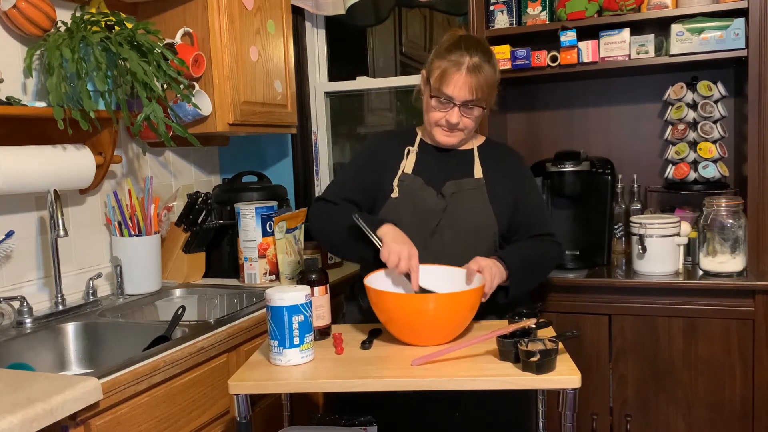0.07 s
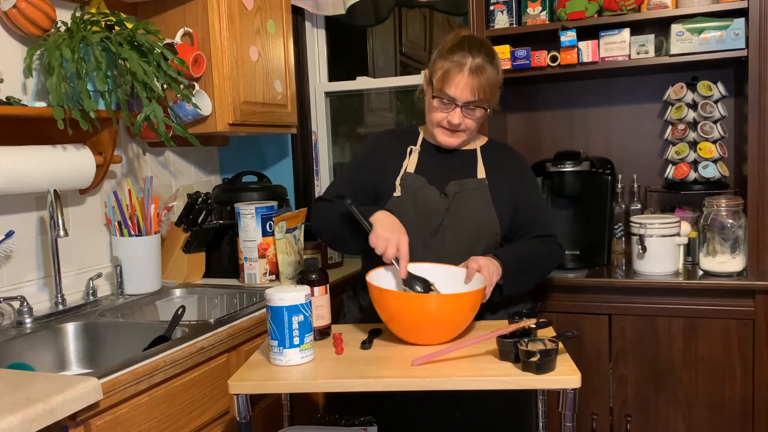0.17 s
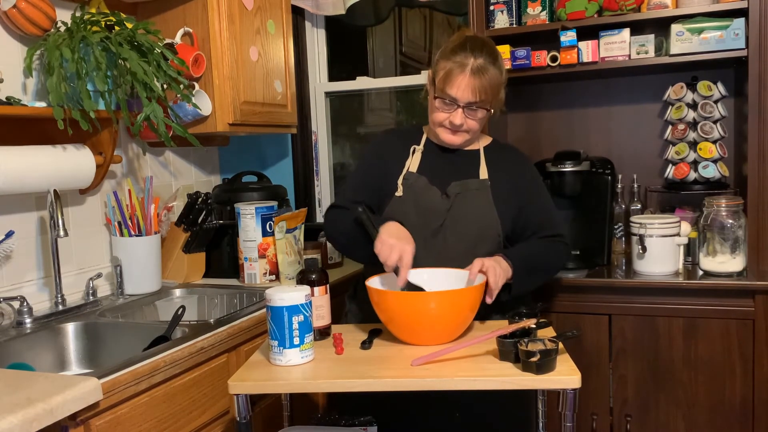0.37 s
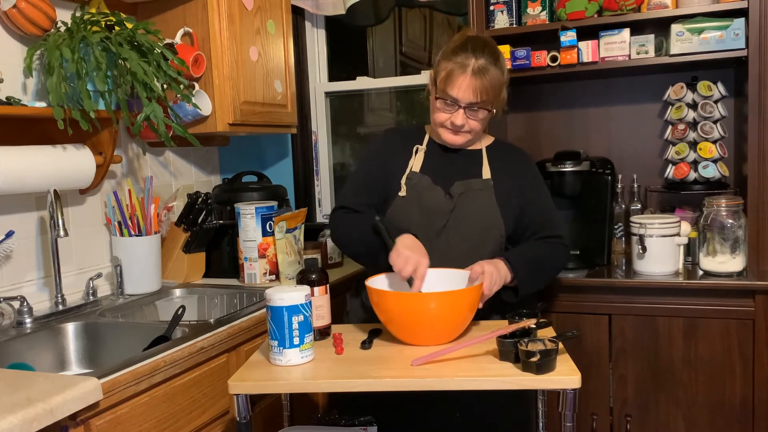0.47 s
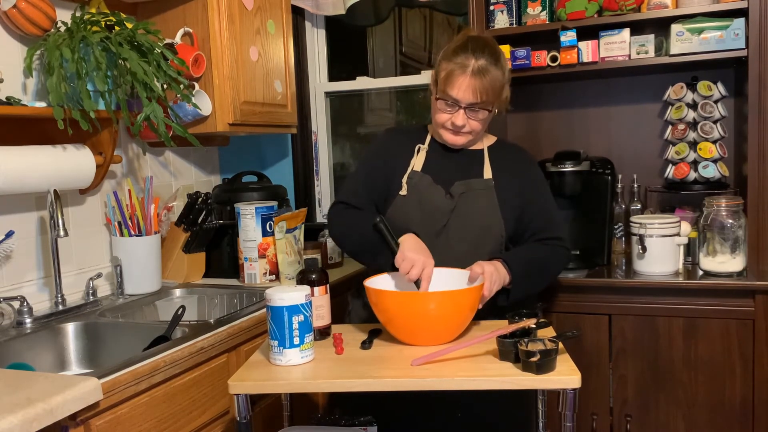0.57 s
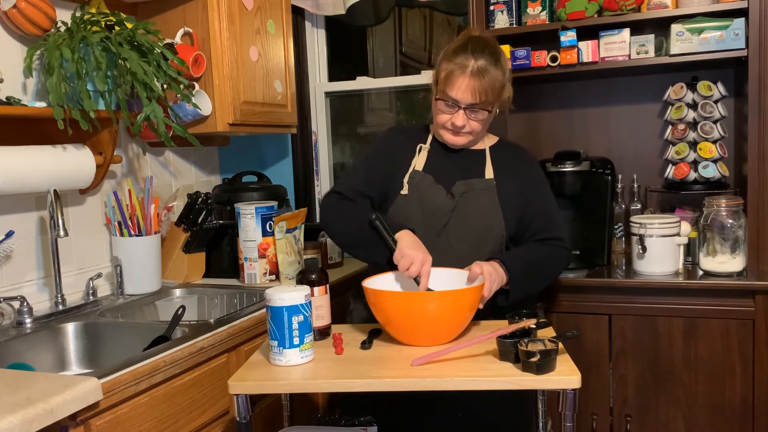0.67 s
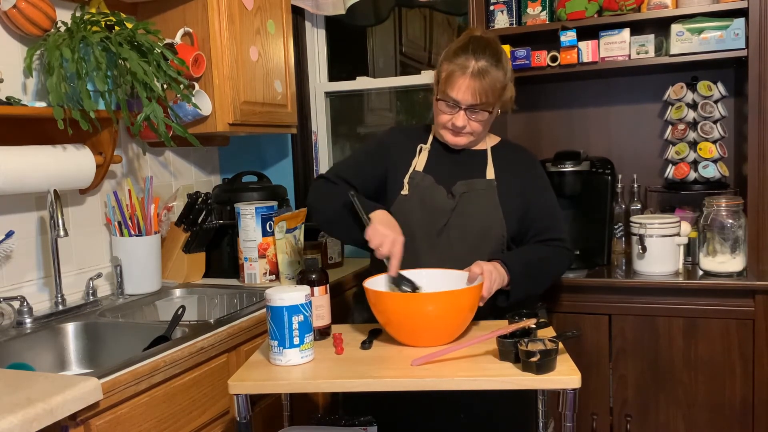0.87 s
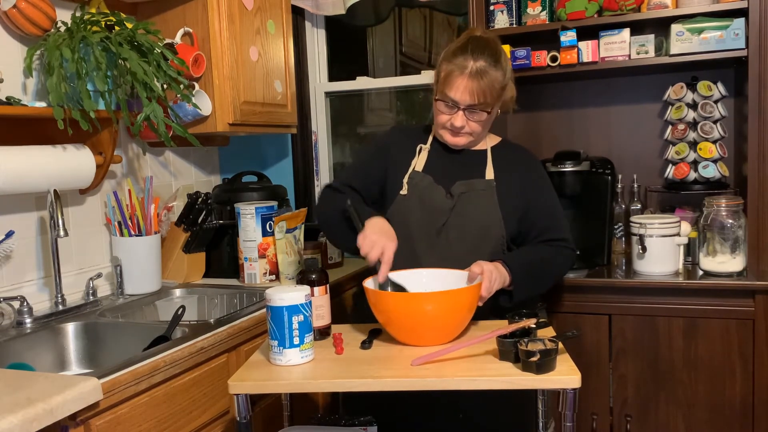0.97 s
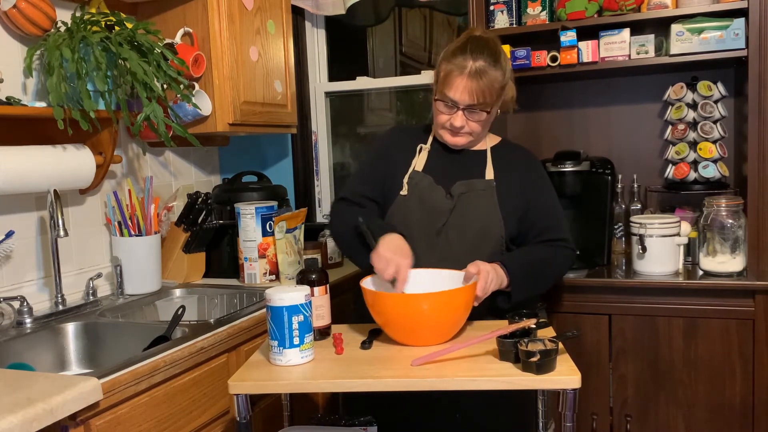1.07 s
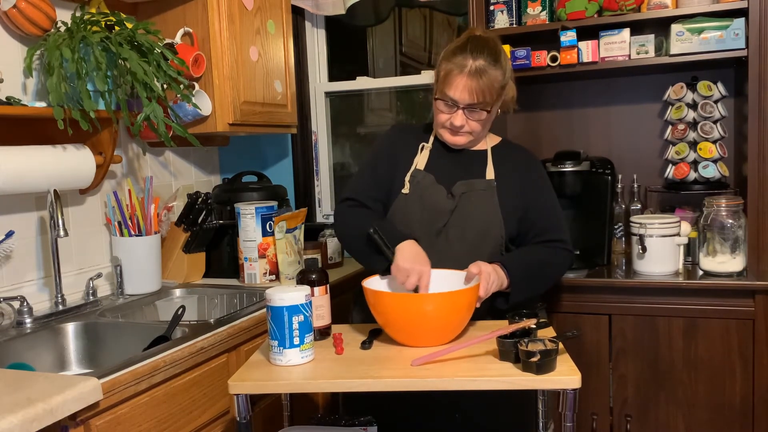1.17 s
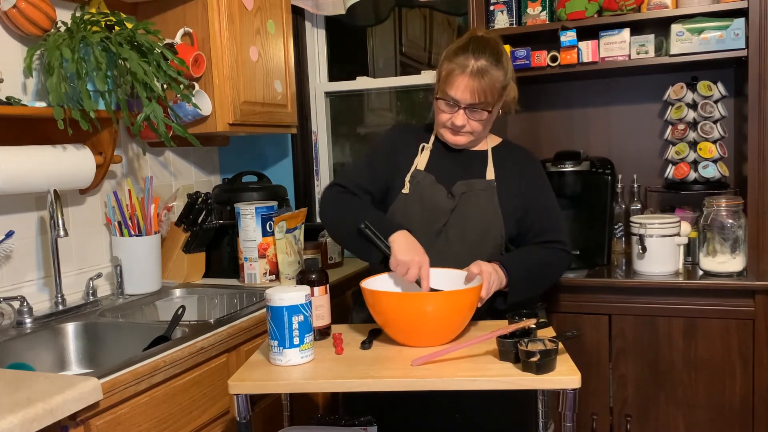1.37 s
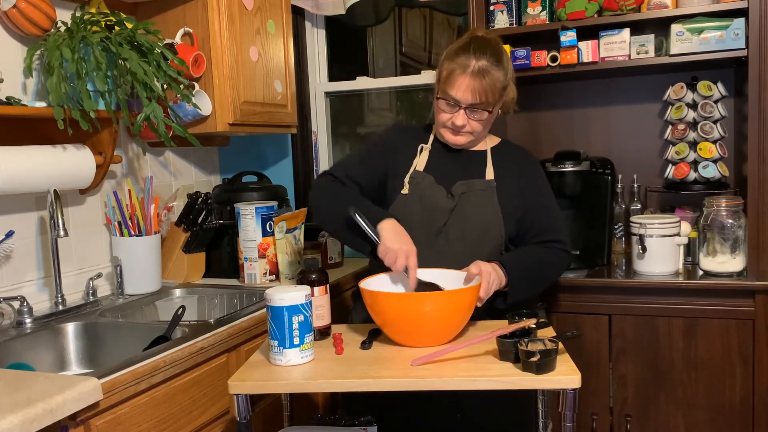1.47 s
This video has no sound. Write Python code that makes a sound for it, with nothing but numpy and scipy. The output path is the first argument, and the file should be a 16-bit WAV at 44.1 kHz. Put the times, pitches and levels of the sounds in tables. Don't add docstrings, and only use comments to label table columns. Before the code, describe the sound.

Stirring thick dough: a quiet scrape, one sharp hollow thud rattling bowl and board, light sticky strokes, then a longer firm drag and a short faint one, in a small room with low hum.

```python
import sys
import numpy as np
from scipy import signal
from scipy.fft import rfft, irfft, next_fast_len
from scipy.io import wavfile
from scipy.ndimage import uniform_filter1d

SR = 44100
rng = np.random.default_rng(int(sys.argv[2]) if len(sys.argv) > 2 else 0)


def wav_out(sig):
    wavfile.write(sys.argv[1], SR, np.round(np.clip(np.atleast_2d(sig).T, -1, 1) * 32767).astype(np.int16))


def voltage_ratio(decibels):
    exponent = np.asarray(decibels, float) / 20
    return 10 ** exponent


N = 66150
T = np.arange(N) / SR


def rms_one(x):
    return x / np.sqrt(np.mean(x ** 2) + 1e-20)


def at_hz(points, hz):
    p = np.array(points, float)
    return np.interp(np.log(np.maximum(hz, 1)), np.log(np.maximum(p[:, 0], 1)), p[:, 1])


def colour(x, gain):
    size = next_fast_len(N + 8192)
    hz = np.arange(size // 2 + 1) * SR / size
    return irfft(rfft(x, size) * gain(hz), size)[..., :N]


def drift(rate):
    r = np.exp(-2 * np.pi * rate / SR)
    noise = rng.standard_normal(N + SR)
    return rms_one(signal.lfilter([1], [1, -2 * r, r * r], noise)[SR:])


def ring(x, hz, t60):
    r = voltage_ratio(-60 / (t60 * SR))
    w = 2 * np.pi * hz / SR
    return signal.lfilter([0, np.sin(w)], [1, -2 * r * np.cos(w), r * r], x + 1e-18)


def resonances(x, table):
    out = 0
    for k, (hz, width, db) in enumerate(table):
        t60 = np.log(1000) / np.pi / width
        out = out + (-1) ** k * voltage_ratio(db) * np.sqrt(width) * ring(x, hz, t60)
    return rms_one(out)


def clicks(s, heights):
    out = np.zeros(N)
    np.add.at(out, (np.asarray(s) * SR).astype(int), heights)
    return out


def bursts(table):
    out = 0
    for s, db, hz, t60 in table:
        swell = ring(ring(clicks([s], voltage_ratio(db)), hz, t60), hz, t60)
        out = out + swell * 2 * np.e * np.log(1000) / (t60 * SR)
    return out


# time in seconds, drag in dB, extra weight on the wall in dB,
# dryness of the scrape in dB.
STROKES = [
    [(0.0, -65.5, 21, -12), (0.018, -66, 7.5, -9), (0.048, -66.5, 15.5, -9.5), (0.092, -66, 7.5, -10.5),
     (0.135, -77, 15, -9.5), (0.17, -101, 5, -17), (0.2, -108, 15, 19)],
    [(0.4, -77, 0, -19), (0.45, -65.5, 6, -14), (0.49, -68, 13, -9.5), (0.53, -72, 13, -13),
     (0.566, -77, -14.5, -9), (0.576, -83.5, 18, -7), (0.664, -77.5, 9, -17), (0.67, -83.5, 3, 0.5)],
    [(0.69, -71, 3, -14), (0.715, -75, -3, -13), (0.745, -83, 2.5, -6), (0.775, -75.5, 8, -12),
     (0.806, -71, -7.5, -14.5), (0.84, -73.5, 1.5, -15), (0.862, -67, 8, -24.5), (0.89, -78.5, 6, -27),
     (0.935, -82, -19, -9)],
    [(1.27, -71, 9, -7.5), (1.325, -80, 11, 1), (1.345, -74.5, 1.5, -0.5), (1.38, -77, -24, -4),
     (1.43, -77.5, 10, -7), (1.446, -76, 7, -10), (1.5, -78.5, -11, -7)],
]
FIRM_STROKE = [(.944, -70, 2, -7), (.951, -60, -4, -4.5), (.97, -66, 13, -2.5), (.99, -66, 10.5, -1.5),
               (1.003, -59, 7.5, -5.5), (1.03, -59.5, 8, -3.5), (1.055, -57.5, 9, -5.5),
               (1.075, -56, -1, -8), (1.095, -52.5, -3, -7), (1.13, -55, 3.5, 0), (1.155, -53, 0.5, -7),
               (1.18, -61, 7.5, -5), (1.215, -65, 0, -6)]
# pitch in Hz, width in Hz, level in dB.
WALL = [(620, 55, 4), (700, 92, 1), (850, 130, -3), (1040, 200, -3), (1410, 99, -13)]
# pitch in Hz, width in Hz, level in dB.
HOLLOW = [(1592, 170, -4.5), (1740, 120, 1), (2086, 220, -1), (2320, 200, 1), (2893, 2900, -4.5)]
# pitch in Hz, width in Hz, level in dB.
BOARD = [(135, 140, 1), (212, 54, -2.5), (310, 49, -8.5), (479, 22, -5.5)]
# frequency in Hz, level in dB per Hz.
RASP = [(1650, -36.5), (2800, 2.5), (6720, 0), (8730, -13.5), (9600, -12.5), (13300, -22), (16000, -14)]


def stir():
    s, *columns = np.concatenate(STROKES[:3] + [FIRM_STROKE] + STROKES[3:]).T
    drag, weight, dry = (np.interp(T, s, c) for c in columns)
    lift_s, return_s = STROKES[0][-1][0], STROKES[1][0][0]
    touching = (T < lift_s) | (T > return_s)

    slips_per_s, spread_db = 2500, 2
    sizes = voltage_ratio(spread_db * np.minimum(rng.exponential(1, N), 4)) * rng.choice([-1, 1], N)
    slips = sizes * (rng.random(N) < slips_per_s / SR * voltage_ratio(3.0 * drift(40)))

    rasp = rms_one(colour(slips, lambda hz: voltage_ratio(at_hz(RASP, hz)) * (hz > 2500)))
    top = colour(rasp, lambda hz: hz > 7930)
    grit = voltage_ratio(4.5 + 0.14 * (drag + 58) + 0.53 * dry) * top
    out = voltage_ratio(-6 + weight) * resonances(slips, WALL)
    out = out + voltage_ratio(-0.5) * resonances(slips, HOLLOW)
    out = out + voltage_ratio(1.5 + dry) * (rasp - top) + grit

    board = voltage_ratio(-56.5 + 0.94 * (drag + 55)) * resonances(np.roll(slips, SR // 3), BOARD)
    return (voltage_ratio(drag) * out + board) * uniform_filter1d(touching * 1.0, size=900)


# frequency in Hz, level in dB per Hz.
AIR = [(80, -4), (130, -9), (190, -8), (290, -7.5), (480, -12), (624, -10.5), (1330, -26), (2760, -30),
       (16000, -37.5)]
# time in seconds, level in dB.
HUM = [(0.0, -52.5), (0.182, -68), (0.38, -65), (0.462, -47), (0.492, -66), (0.53, -56), (0.718, -63),
       (0.78, -56.5), (0.844, -67), (0.925, -52), (0.948, -78), (0.98, -49), (1.136, -41), (1.168, -76),
       (1.202, -56), (1.35, -56), (1.474, -64.5), (1.5, -77.5)]


def background():
    air = colour(rng.standard_normal((2, N)), lambda hz: voltage_ratio(at_hz(AIR, hz)) * (hz > 70))
    hum_hz, rumble_width_hz = 58.2, 18
    tone = np.sin(2 * np.pi * hum_hz * T + 0.73 * drift(1)) * np.sqrt(2)
    hum = voltage_ratio(-0.97 + 2.7 * drift(7.4)) * tone
    noises = rng.standard_normal((2, N))
    rumble = np.array([resonances(w, [(hum_hz, rumble_width_hz, 0)]) for w in noises])
    load_db = np.minimum(np.interp(T, *np.transpose(HUM)), -54)
    fridge = voltage_ratio(load_db) * (hum + voltage_ratio(-11) * rumble)
    return voltage_ratio(-71.5 + 1.5 * drift(3.2)) * rms_one(air) + fridge


# start in seconds, peak in dB,
# pitch in Hz, time to fall 60 dB in seconds.
NUDGES = [(.002, -57, 160, 0.038), (.395, -46.5, 59.5, 0.1), (.47, -54, 88, 0.08), (.47, -53.5, 620, 0.056),
          (.625, -62.5, 630, .04), (.848, -61, 608, 0.056), (.859, -60, 642, 0.021),
          (.868, -64.5, 700, 0.028), (.90, -62, 161, 0.058), (1.012, -49, 497, 0.046),
          (1.015, -49, 630, 0.073), (1.06, -48, 512, 0.048), (1.095, -52.5, 490, 0.042),
          (1.10, -54, 1030, .03), (1.085, -45, 1880, .03), (1.105, -52, 1880, .025),
          (1.145, -56.5, 150.1, 0.13), (1.33, -64, 175, 0.035), (1.45, -70.5, 310, 0.059)]


def nudges():
    return bursts(NUDGES)


# time in seconds, level in dB.
KNOCKS = [
    (0.2324, -35),
    (0.2346, -23.5),
    (0.2374, -32.5),
    (.2445, -33),
    (0.2549, -35),
    (0.2647, -38),
    (0.2771, -34.5),
]
# pitch in Hz, level in dB, time to fall 60 dB in seconds.
MODES = [(51.4, -9.5, 0.44), (77.1, -9.5, 0.36), (127.4, -3.5, 0.31), (212.5, -5.5, 0.16),
         (296.2, -5.5, .17), (403, -7.5, 0.09), (466, -10.5, 0.26), (679, -7.5, 0.07), (815.5, -6, 0.2),
         (1030, -6.5, 0.071), (1314, -9.5, 0.2), (1716, -8, 0.099), (2120, -6.5, 0.1), (2394, -8.5, 0.15),
         (2977, -14, 0.13)]
# start in seconds, peak in dB, pitch in Hz,
# time to fall 60 dB in seconds.
THUDS = [
    (.2322, -30, 1090, 0.011),
    (.2334, -29, 1950, .012),
    (.2345, -18, 431, .018),
    (.2350, -19, 675, 0.018),
    (.2378, -31, 2360, .008),
    (.2395, -25, 647, 0.015),
    (.2530, -26, 462, .014),
    (.2690, -31, 620, .02),
    (.2760, -26, 220, .025),
]


def knock():
    swell_cycles, luck_db = 0.42, 2
    s, db = np.transpose(KNOCKS)
    luck = rng.normal(0, luck_db, (len(s), len(MODES)))
    out = 0
    for k, (hz, level_db, t60) in enumerate(MODES):
        ringing = ring(clicks(s, voltage_ratio(db + level_db + luck[:, k])), hz, t60)
        r = np.exp(-hz / swell_cycles / SR)
        out = out + ring(ringing, hz, np.log(1000) * swell_cycles / hz) * 2 * (1 - r)
    return out + bursts(THUDS)


# frequency in Hz, level in dB per Hz.
CLATTER = [(100, -1), (300, -3), (676, -0.5), (1500, -8), (2400, -7), (3300, -18), (4400, -15.5),
           (8000, -30.5), (13000, -32.5)]
# frequency in Hz, time to fall 60 dB in seconds.
CLATTER_T60 = [(100, 0.45), (420, 0.15), (1100, 0.18), (2900, 0.34), (7700, 0.45), (14000, 0.46)]


def clatter():
    start_s, hold_s, approach_s = 0.2325, 0.014, 0.0052
    rise_s, rise_cycles = 0.0027, 1.1
    late_db, late_t60_s, late_low_hz, late_cut_hz = -21.5, 0.61, 250, 5000
    treble_sink_s = 0.055
    t = T - start_s
    age = np.maximum(t - hold_s, 0)
    early = 0.23 * np.exp(np.minimum(t, 0) / approach_s)
    white = rng.standard_normal((2, 2, N))
    edges = 80 * 2 ** np.arange(0, 7.8, .5)
    out = 0
    for k, (low, high) in enumerate(zip(edges, edges[1:])):
        t60 = at_hz(CLATTER_T60, np.sqrt(low * high))
        approach = early * (t < .001) * (low > late_low_hz)
        rise = np.maximum(approach, 1 - np.exp(-np.maximum(t, 0) / (rise_s + rise_cycles / low)))
        fall = voltage_ratio(-60 * age / t60 * (1 + age / treble_sink_s * low / 10000))
        late = voltage_ratio(late_db) / (1 + (low / late_cut_hz) ** 4 + (late_low_hz / low) ** 2)
        sos = signal.butter(2, [low, high], "band", fs=SR, output="sos")
        band = signal.sosfilt(sos, white[k % 2])
        out = out + band * rise * (fall + late * voltage_ratio(-60 * age / late_t60_s))
    tint = lambda hz: voltage_ratio(at_hz(CLATTER, hz))
    return voltage_ratio(-25.5) * colour(out, tint) / np.std(colour(white[0, 0], tint))


# start in seconds, peak in dB, pitch in Hz, time to fall 60 dB in seconds.
POPS = [(.6806, -51.5, 1950, 0.0061), (.6808, -60, 2520, .004), (.6850, -64, 1750, .006),
        (.6918, -64, 2050, 0.0052), (.6955, -55.5, 2014, .005), (.6978, -68, 1950, .007),
        (.7022, -64, 2030, .007), (.7065, -67, 1800, .008), (.715, -66, 1900, .008),
        (.725, -63, 1760, 0.0057), (.808, -62.5, 1876, 0.022), (.83, -66, 2390, 0.01),
        (.9495, -54, 4360, 0.0039), (.9502, -69, 11000, 0.0006), (.9505, -73, 6550, .001),
        (0.997, -47.5, 2260, 0.0052), (1.1245, -52, 12600, 0.00068), (1.1262, -49, 6500, 0.00086)]


def pops():
    return bursts(POPS)


def kitchen(x, wet_db):
    t = T[:SR // 2]
    tails = rng.standard_normal((2, len(t))) * voltage_ratio(-60 * t / 0.18) * (t > .002)
    tails = tails / np.sqrt(np.sum(tails ** 2, axis=1, keepdims=True))
    mid, side = signal.fftconvolve(x[None], tails)[:, :N]
    return np.array([(x + voltage_ratio(wet_db) * mid) / np.sqrt(1 + voltage_ratio(2 * wet_db)), side + 0.2 * x])


def notches(table):
    def gain(hz):
        bells = sum(db * np.exp(-((hz - at) / width) ** 4) for at, width, db in table)
        return voltage_ratio(bells) / np.sqrt(1 + (68 / (hz + 1)) ** 8)
    return gain


# centre in Hz, width in Hz, change in dB.
MID_NOTCHES = [(9580, 590, -8), (13050, 1900, 6), (15100, 650, 3.5), (16500, 650, -21)]
# centre in Hz, width in Hz,
# change in dB.
SIDE_NOTCHES = [(7190, 2800, -9), (13700, 600, -8.5), (16700, 650, -21.5)]
# frequency in Hz, side minus mid in dB.
WIDTH = [(60, -12.5), (200, -12.5), (400, -7.5), (1300, -4), (2400, -1), (4400, 2.5), (8500, 10.5),
         (15000, -0.5)]
# frequency in Hz, left minus right in dB.
LEAN = [(60, -0.5), (400, -0.5), (700, -2.5), (2400, -2), (4400, 2), (8000, -0.7)]


def scene():
    hush = 1 - np.exp(-((T - 0.946) / 0.009) ** 2)
    mix = kitchen(stir(), -6) + kitchen(nudges() + pops(), -7) + kitchen(knock(), -4.5)
    mid, side = mix + clatter() + hush * background()
    mid = colour(mid, notches(MID_NOTCHES))
    side = colour(side, lambda hz: voltage_ratio(at_hz(WIDTH, hz)) * notches(SIDE_NOTCHES)(hz))
    left = colour(mid + side, lambda hz: voltage_ratio(at_hz(LEAN, hz) / 2))
    right = colour(mid - side, lambda hz: voltage_ratio(-at_hz(LEAN, hz) / 2))
    return np.array([left, right])


def top_cut(x):
    return signal.sosfilt(signal.butter(12, 16430, fs=SR, output="sos"), x)


def record(dry):
    return top_cut(dry)


dry = scene()
out = record(dry)
wav_out(out)
```